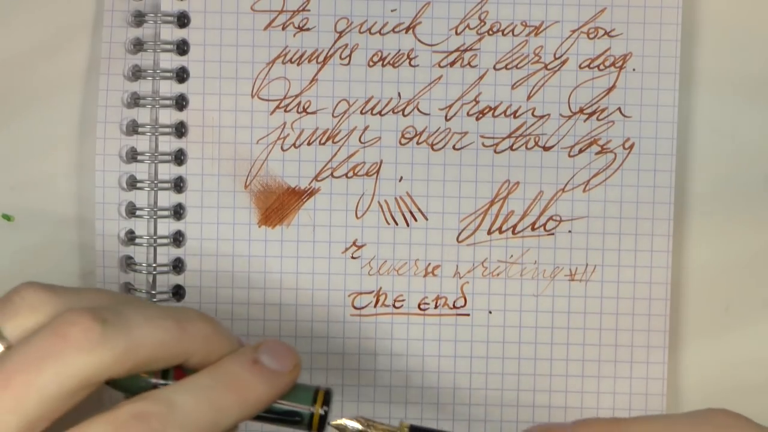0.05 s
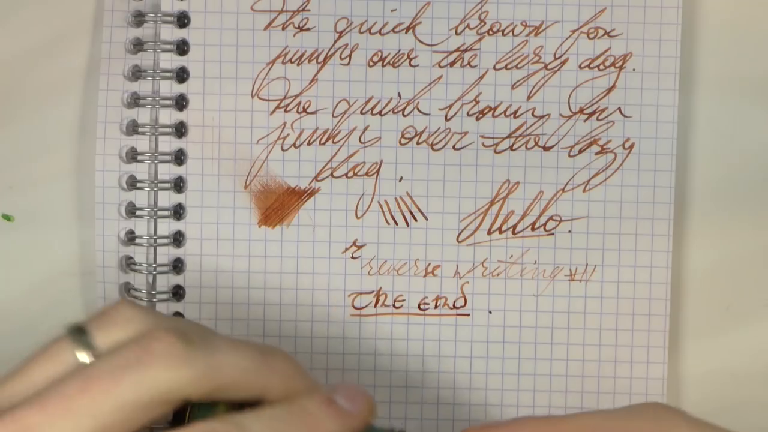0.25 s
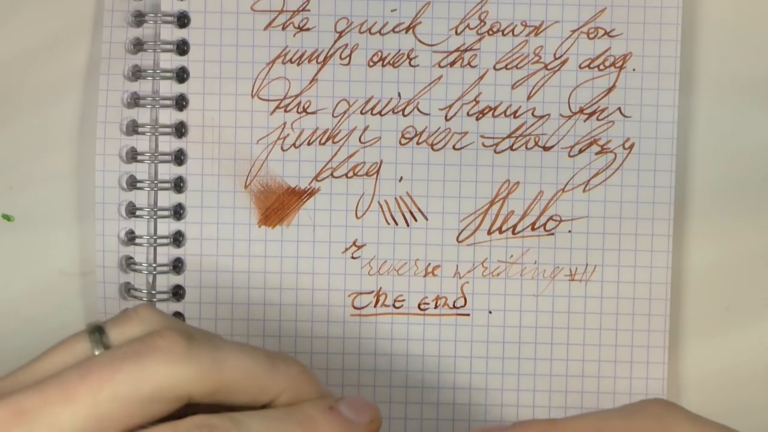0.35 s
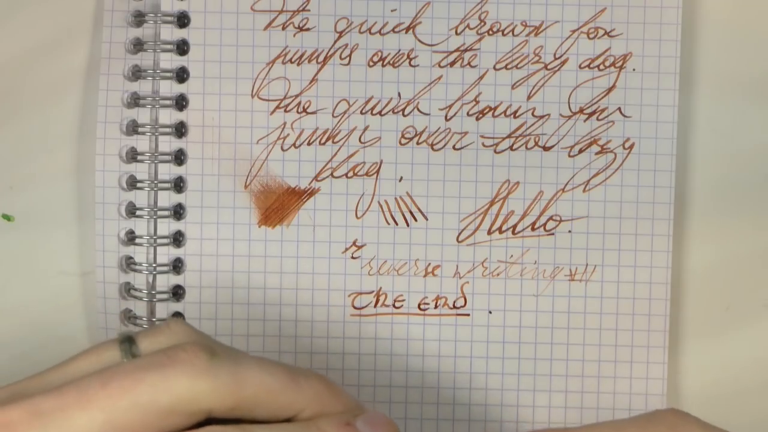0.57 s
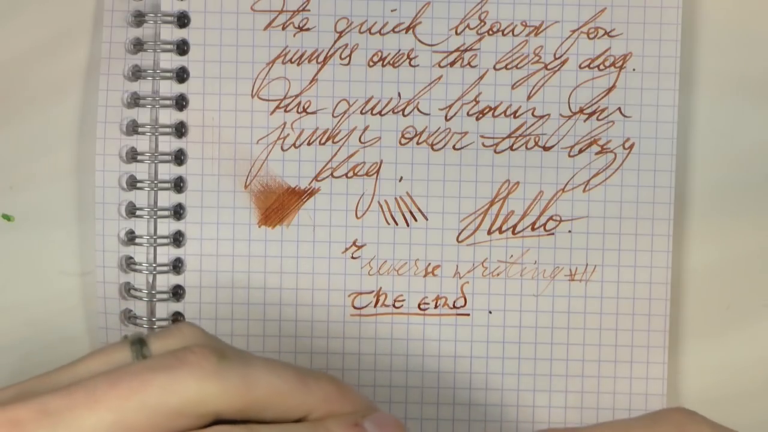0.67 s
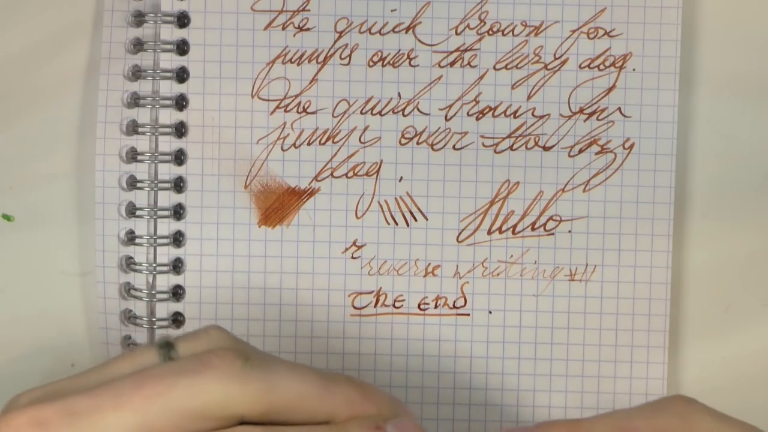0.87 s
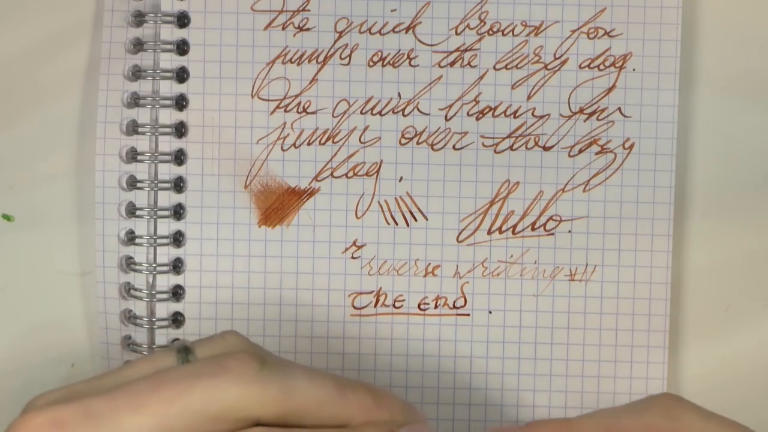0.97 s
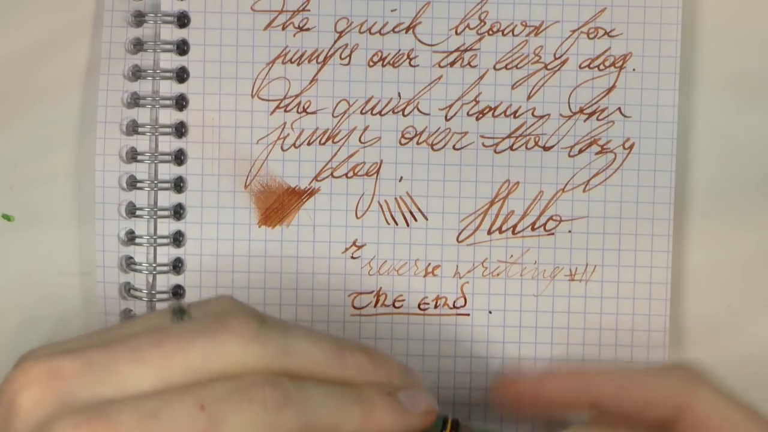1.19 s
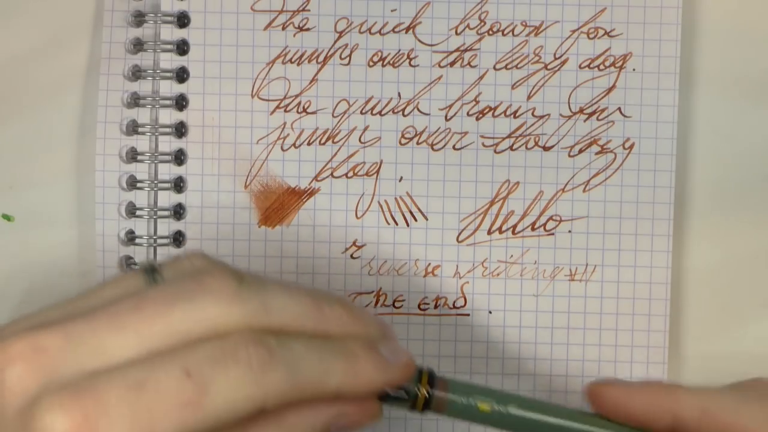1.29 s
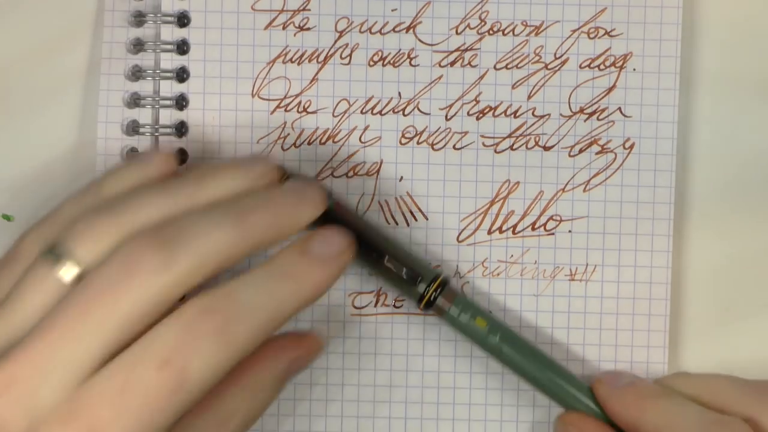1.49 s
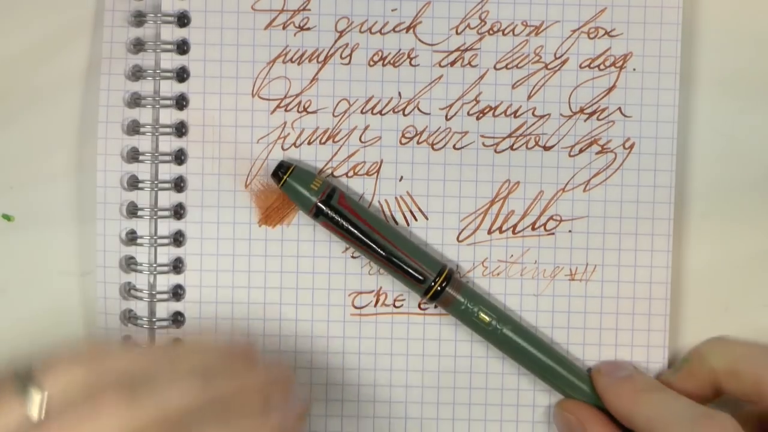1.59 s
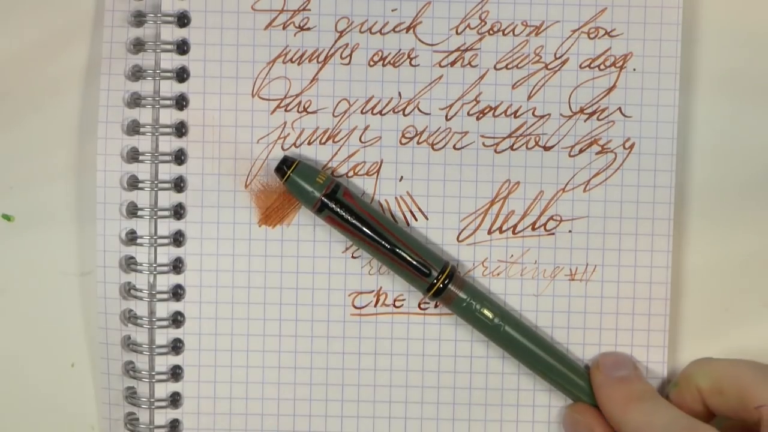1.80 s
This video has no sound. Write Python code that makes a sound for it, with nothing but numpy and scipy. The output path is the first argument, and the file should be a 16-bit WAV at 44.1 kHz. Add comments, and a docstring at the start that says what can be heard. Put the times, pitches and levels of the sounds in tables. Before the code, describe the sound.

A plastic pen cap clicks and snaps onto a pen, then knocks on a paper notebook

```python
"""Behind everything a fan hums as coloured noise with faint wavering tones, and hands rustle on paper.
A plastic pen cap knocks, slides and snaps onto the pen close by: damped modes rung by taps and tiny slips.
A small room answers with a tail of decaying noise, and the desk booms under soft pushes on its modes.
Further knocks follow as the pen is laid on a notebook; a finger rubs the barrel as a falling noise band,
and then a page slaps under the pen as a short burst of noise."""
import sys
import numpy as np
from scipy import signal
from scipy.fft import rfft, irfft
from scipy.io import wavfile
from scipy.ndimage import uniform_filter1d

SR = 44100
rng = np.random.default_rng(int(sys.argv[2]) if len(sys.argv) > 2 else 0)


def dump(signal):
    """Clip the signal to [-1, 1] and save it as 16-bit WAV at the path in sys.argv[1]."""
    limited = np.clip(np.atleast_2d(signal).T, -1, 1)
    pcm = np.round(limited * 32767).astype(np.int16)
    wavfile.write(sys.argv[1], SR, pcm)


N = 81585
T = np.arange(N) / SR  # time [s]


def gain_of(db):
    """Decibels to gain."""
    return 10 ** (np.asarray(db) / 20)


def evened(x):
    """Scales to rms 1."""
    return x / np.sqrt(np.mean(x ** 2) + 1e-20)


def read(points, hz):
    """Reads a spectrum on a log-frequency axis."""
    f, value = np.transpose(points)
    return np.interp(np.log(hz + 1), np.log(f + 1), value)


def curve(points):
    """Reads a curve in time."""
    return np.interp(T, *np.transpose(points))


def filtered(x, order, hz, kind):
    """Butterworth filter."""
    return signal.sosfilt(signal.butter(order, hz, kind, fs=SR, output="sos"), x)


def hiss(spectrum, same):
    """Two channels of coloured noise of rms 1; same is their likeness, from -1 to 1."""
    hz = np.fft.rfftfreq(N, 1 / SR)
    left, other = rfft(rng.standard_normal((2, N)), axis=1)
    right = same * left + np.sqrt(1 - same ** 2) * other
    return evened(irfft(np.array([left, right]) * gain_of(read(spectrum, hz)), N, axis=1))


def ring(modes, rise, step):
    """Dying sines (Hz, dB, t60 s) answer one tap with a soft rise; each is weighted step times the last."""
    t = T[:SR // 3]
    total = np.zeros(len(t))
    for k, (hz, db, t60) in enumerate(modes):
        total += step ** k * gain_of(db - 60 * t / t60) * np.sin(2 * np.pi * hz * t)
    return (1 - np.exp(-t / rise)) * total


def fan_tones():
    """Narrow fan tones whose loudness and phase waver together with smoothed noise."""
    # fan tones: (frequency [Hz], waver rate [1/s], amplitude over the background level [dB])
    fan = [(130.68, 16, -11.5), (368.4, 8, -7.5), (745.6, 8, -7.5), (1956, 26, -10.5), (3274, 10, -4)]
    tones = 0
    for hz, rate, db in fan:
        waver = evened(uniform_filter1d(rng.standard_normal(N), round(SR / rate)))
        loudness = gain_of(db) * (1 + 0.12 * waver)
        tones = tones + loudness * np.sin(2 * np.pi * (hz * T + 0.033 * waver))
    return tones


def background():
    """Coloured room noise and the fan tones, following one slow level."""
    # colour of the room noise: (frequency [Hz], relative density [dB per Hz])
    noise_colour = [(20, -15), (70, -11.5), (120, -6), (250, -6), (370, -7.5), (520, -14), (750, -14),
                    (1000, -18), (1400, -15), (1900, -8.5), (2600, -11.5), (3250, -8.5), (3700, -17),
                    (5500, -23), (7500, -25.5), (8600, -29), (9500, -22.5), (14400, -26.5), (15200, -60),
                    (16500, -58)]
    # left-right likeness of the noise: (frequency [Hz], likeness [-1 to 1])
    likeness = [(60, 0.08), (180, 0.04), (550, 0.66), (1650, 0.94), (4970, 1), (15000, 0.9)]
    # level that noise and tones follow: (time [s], level [dB])
    level = [(0.0, -53), (0.266, -54.5), (0.462, -58.5), (1.086, -57.5), (1.364, -61.5), (1.606, -61),
             (1.73, -58.5), (1.85, -56)]
    noise_over_db = 3  # noise above that level
    same = np.clip(read(likeness, np.fft.rfftfreq(N, 1 / SR)), -1, 1)
    noise = gain_of(noise_over_db) * hiss(noise_colour, same)
    return gain_of(curve(level)) * (noise + fan_tones())


def hand_rustle():
    """Hands on paper: coloured noise made grainy by quick level changes."""
    # strength of the rustle: (time [s], level [dB])
    strength = [(0, -92), (.06, -63), (.085, -53), (.11, -61.5), (.2, -62), (.4, -87), (1.7, -63.5),
                (1.78, -82.5), (1.83, -69), (1.85, -62.5)]
    # colour of the rustle: (frequency [Hz], relative density [dB per Hz])
    colour = [(100, 7.5), (400, -17.5), (1000, 1), (2000, -2), (4500, 9), (7000, -4.5), (15000, -26)]
    grain = gain_of(1.9 * evened(uniform_filter1d(rng.standard_normal(N), 60)))
    return gain_of(curve(strength)) * evened(grain * hiss(colour, 1.0))


def plastic(part, tilt_db, widen):
    """One tap on a held part of the pen, its modes widened at equal energy."""
    # modes of the cap rim, before damping and tilt: (frequency [Hz], width [Hz], level [dB])
    rim = [(1948, 178, -0.5), (3100, 390, 8.5), (4790, 160, 2.5), (5360, 71, -4), (6300, 280, -2.5),
           (7160, 280, -7.5), (7890, 190, 1), (9420, 140, -11.5), (10630, 270, -2.5), (11706, 92, -25),
           (13310, 67, -28), (14140, 260, -26)]
    # modes of the barrel: columns as for the rim
    barrel = [(1420, 99, 2), (2306, 167, 9), (3730, 450, 14.5), (5626, 48, -6.5), (6420, 73, -13),
              (7620, 210, 0.5), (9550, 140, -4.5), (10400, 72, -29), (10570, 30, -19), (11580, 170, -18),
              (12900, 160, -20), (14200, 220, -16)]
    # modes of the metal cap band: columns as for the rim
    metal_band = [(2570, 310, -4.5), (4000, 390, -15.5), (6270, 250, -10.5), (8140, 206, -1),
                  (9360, 190, -1), (10600, 220, -11), (10800, 370, -2), (13200, 400, -14),
                  (14200, 200, -25.5)]
    # modes of the grip section: columns as for the rim
    grip = [(1454, 500, -12), (2340, 191, -0.5), (3640, 160, -5), (4170, 170, -4.5), (5370, 620, -0.5),
            (6960, 290, -11), (7933, 490, -1.5), (9040, 220, -17), (10400, 340, -4), (12900, 350, -21),
            (14100, 250, -33)]
    # a broad top mode shared by all parts: columns as for the rim
    edge_mode = (15600, 500, -22.5)
    # fingers widen the modes of each part: {part: factor}
    finger_damping = {"rim": 2.01, "barrel": 2.39, "band": 1.43, "grip": 1.33}
    tilt_hz, rise_s = 5000, 0.00029  # pivot of the tilt [Hz]; swell before widening [s]
    parts = {"rim": rim, "barrel": barrel, "band": metal_band, "grip": grip}
    modes = []
    for hz, width, db in parts[part] + [edge_mode]:
        tilted_db = db + tilt_db * np.log2(hz / tilt_hz)
        t60 = 1.92 / (width * finger_damping[part] * widen)  # wider modes die sooner
        modes.append((hz, tilted_db, t60))
    # the negative step alternates the signs of the modes
    return np.sqrt(widen) * ring(modes, rise_s / widen, -1.042)[:2048]


def pen_knocks():
    """Knocks ring the parts of the pen; returns the direct sound and that spread to the walls."""
    # knocks; where a part is struck tilts its modes:
    # (time [s], part, level [dB], tilt [dB/octave])
    knocks = [(0.2031, "band", -16.5, -1), (0.206, "band", -35, -18.5), (0.2063, "band", -22.5, -1),
              (0.244, "rim", -11.5, 1), (0.2447, "rim", -13.5, -1), (0.2467, "rim", -10, 11),
              (0.2476, "rim", -22.5, -10), (.2720, "grip", -27, 5), (0.3141, "grip", -10, -1.5),
              (0.9765, "barrel", -10, 0.5), (0.9781, "barrel", -22, 1), (.9792, "barrel", -23.5, -1),
              (0.9844, "barrel", -31, -6), (.9900, "band", -20, 7), (1.261, "rim", -49.5, -3.5),
              (1.291, "band", -50, 0.5), (1.380, "rim", -49, 2), (1.463, "band", -53, 2.5),
              (1.5522, "grip", -28.5, 4), (1.5537, "grip", -24, -10), (1.661, "band", -56, 5),
              (1.678, "band", -46.5, -3.5)]
    spread_damp = 2.4  # the mix of directions that reaches the walls widens the modes
    out = np.zeros((2, N))
    for s, part, db, tilt_db in knocks:
        taps = np.array([plastic(part, tilt_db, 1), plastic(part, tilt_db, spread_damp)])
        out[:, round(s * SR):][:, :2048] += gain_of(db) * taps
    return out


def cap_slide():
    """While the cap slides on, random tiny slips of either sign ring the rim and the grip."""
    # force of the slips on the rim: (time [s], level [dB])
    slide_force = [(.248, -60), (.253, -48), (.261, -47), (.266, -57), (.278, -50), (.290, -50.5),
                   (.302, -51.5), (.309, -39), (.322, -48.5), (.332, -55), (.345, -77)]
    slips_per_s, slip_spread_db = 2800, 4.2  # slips on each part; scale of their uneven strength
    grip_db = -3.5  # grip against rim
    slip_damp = 1.5  # rubbing widens the modes
    hits = rng.random((2, N)) < slips_per_s / SR
    strength = gain_of(slip_spread_db * np.minimum(rng.exponential(1, (2, N)), 3))
    slips = hits * strength * rng.choice([-1, 1], (2, N))
    sliding = (T > slide_force[0][0]) & (T < slide_force[-1][0])
    force = evened(slips) * gain_of(curve(slide_force)) * sliding * gain_of([[0], [grip_db]])
    on_rim = signal.oaconvolve(force[0], plastic("rim", 0, slip_damp))
    on_grip = signal.oaconvolve(force[1], plastic("grip", 0, slip_damp))
    return (on_rim + on_grip)[:N]


def pen():
    """Knocks and slide without bass, since small things send out little; direct and spread sound."""
    return filtered(pen_knocks() + cap_slide(), 2, 800., "high")


def room(x):
    """A dense noise tail with a quick and a slow part, a little different left and right."""
    # decay of the quick part: (frequency [Hz], t60 [s])
    quick_t60 = [(150, 0.46), (500, 0.13), (1200, 0.12), (2500, 0.33), (5000, 0.12), (9000, 0.2),
                 (15000, 0.06)]
    # colour of the tail: (frequency [Hz], level [dB])
    tail_colour = [(150, -3.5), (600, -8.5), (1500, -11.5), (3000, -14.5), (6000, -5), (14000, -15.5)]
    # slow part against the quick part at the start: (frequency [Hz], level [dB])
    slow_level = [(300, -32), (800, -14.5), (1500, -8.5), (2500, -6.5), (4500, -17.5), (9000, -36.5)]
    slow_t60, gap_s, width = 0.6, 0.005, 0.35  # decay [s]; silence ahead [s]; share of side sound
    length = SR // 2
    hz, t, z = signal.stft(rng.standard_normal((2, length)), SR, nperseg=128)
    t60 = read(quick_t60, hz)[:, None]
    quick = gain_of(-60 * t / t60)
    slow = gain_of(read(slow_level, hz)[:, None] - 60 * t / slow_t60)
    # the root keeps the energy of the quick part independent of its decay time
    colour = gain_of(read(tail_colour, hz))[:, None] * np.sqrt(14 / SR / t60)
    tail = signal.istft(z * (quick + slow) * colour, SR, nperseg=128)[1][:, :length]
    mid, side = tail * (T[:length] > gap_s)
    stereo = np.array([mid + width * side, mid - width * side])
    return signal.fftconvolve(x[None], stereo, axes=1)[:, :N]


def desk():
    """Soft pushes ring the notebook and desk top; a longer contact is duller."""
    # blows on notebook and desk: (time [s], level [dB], contact [s])
    blows = [(.325, -41, 0.0024), (.666, -29, 0.0059), (0.673, -28.5, 0.0048), (0.6858, -36, 0.0028),
             (0.9757, -32.5, 0.0019), (1.5535, -15, 0.001), (1.638, -49, 0.0036), (1.761, -41.5, 0.0027)]
    # modes of the desk, before the step from mode to mode: (frequency [Hz], level [dB], t60 [s])
    desk_modes = [(140, -12, 0.11), (194, -10, 0.088), (308, -11, 0.054), (447, -3.5, 0.053),
                  (575, 7, 0.021), (593, -12.5, 0.22), (723, 12, 0.028), (748.6, -9.5, 0.33),
                  (801, -7, 0.11), (875, -15, 0.18), (1020, -16, 0.066)]
    force = np.zeros(N)
    for s, db, contact in blows:
        u = np.clip((T - s) / contact, 0, 1)
        push = np.sin(np.pi * u) ** 2
        force += gain_of(db) * push / push.sum()
    wood = -signal.oaconvolve(force, ring(desk_modes, 0.00042, 0.96))[:N]
    return filtered(wood, 3, [140., 1100.], "band")


def finger_rub():
    """A finger slides on the barrel: a band of friction noise moves down in pitch."""
    # finger slide: (time [s], level [dB], centre of the band [Hz])
    rub_path = [(1.03, -78, 3117), (1.08, -50, 2810), (1.111, -53.5, 2518), (1.155, -53.5, 2020),
                (1.189, -80, 1884)]
    width_hz = 990
    s, db, hz = np.transpose(rub_path)
    noise = rng.standard_normal(N) + 1j * rng.standard_normal(N)
    band = filtered(noise, 2, width_hz / 2, "low")
    # a gliding complex tone carries the noise band up to its centre
    carrier = np.exp(2j * np.pi * np.cumsum(np.interp(T, s, hz)) / SR)
    rubbing = (T > s[0]) & (T < s[-1])
    return evened((band * carrier).real) * gain_of(np.interp(T, s, db)) * rubbing


def page_slap():
    """The page slaps under the pen: paper noise starts at once and dies away."""
    # colour of the slap: (frequency [Hz], relative density [dB per Hz])
    slap_colour = [(1200, -12.5), (2200, 2.5), (4500, -8), (6500, -16), (10000, -9), (14500, -22),
                   (16500, -35)]
    start_s, level_db, t60 = 1.553, -30.5, 0.064  # [s], [dB], [s]
    fall = gain_of(level_db - 60 * np.abs(T - start_s) / t60)
    return hiss(slap_colour, 0.94) * fall * (T > start_s)


def scene():
    """Pen and desk just left of centre, their room tail, rub, slap and background."""
    lean_db = 0.25  # left up, right down by this much
    direct, spread = pen()
    wood = desk()
    near = (direct + wood) * gain_of([[lean_db], [-lean_db]])
    tail = room(spread + wood)
    return near + tail + finger_rub() + page_slap() + background() + hand_rustle()


def record(dry):
    """A steep low-pass sets the band limit."""
    edge_hz = 16700
    lowpass = signal.firwin(511, edge_hz, window=("kaiser", 9), fs=SR)
    return signal.oaconvolve(dry, lowpass[None], "same")


dry = scene()
out = record(dry)
dump(out)
```